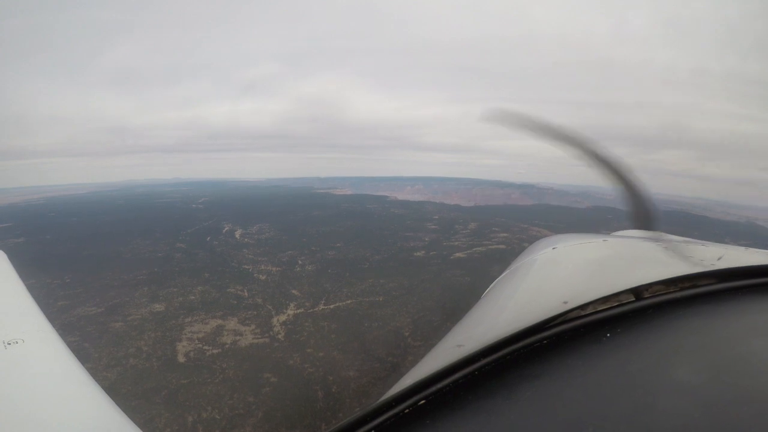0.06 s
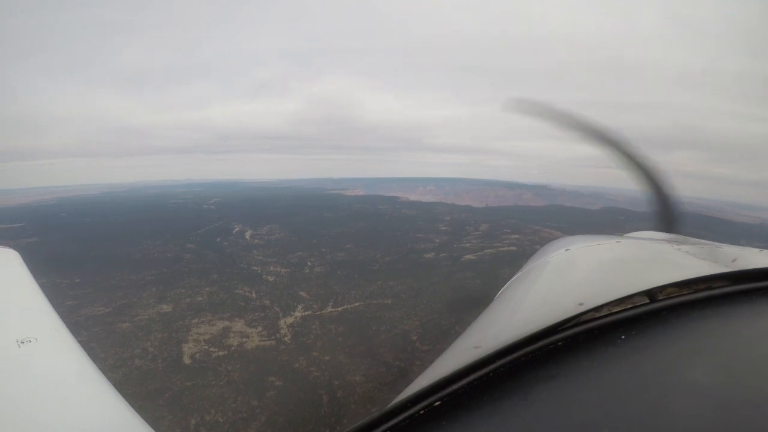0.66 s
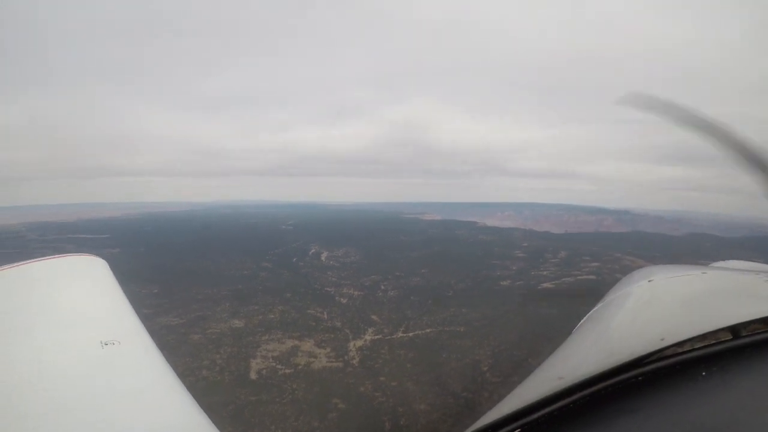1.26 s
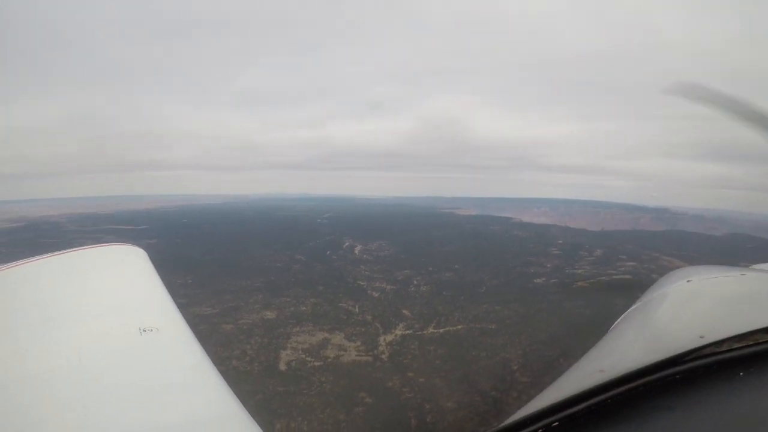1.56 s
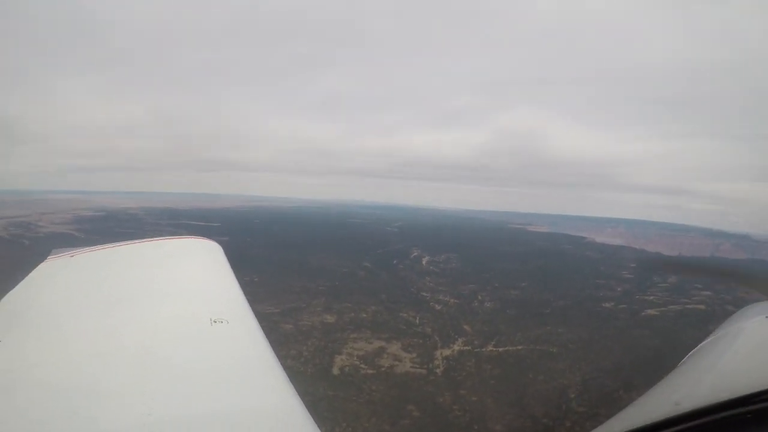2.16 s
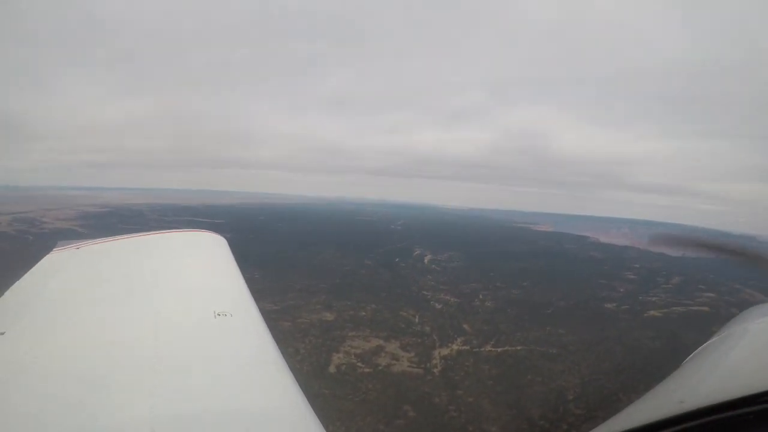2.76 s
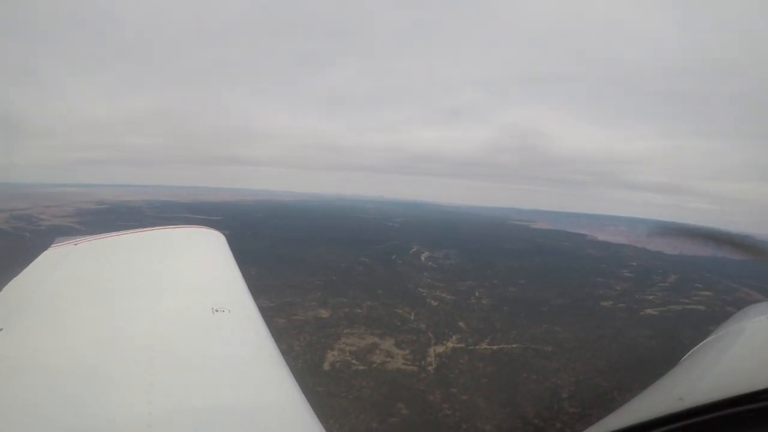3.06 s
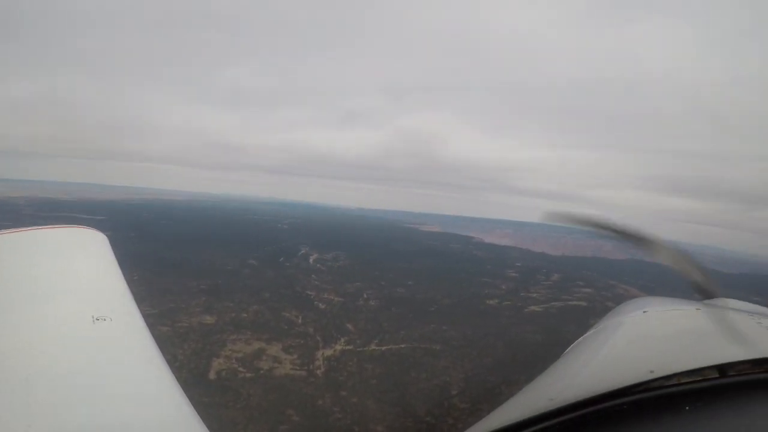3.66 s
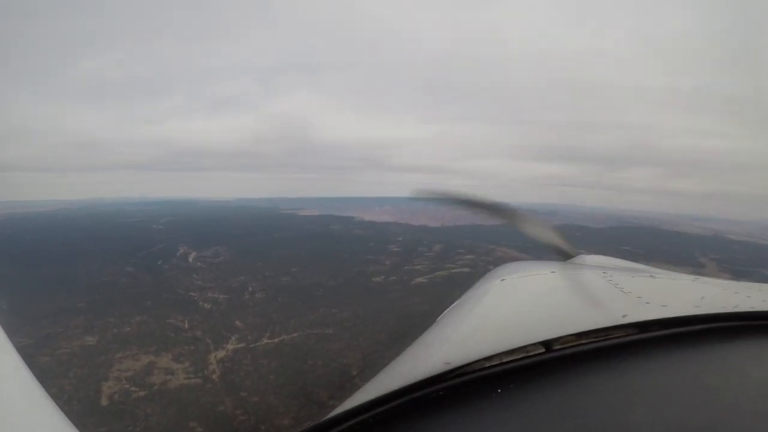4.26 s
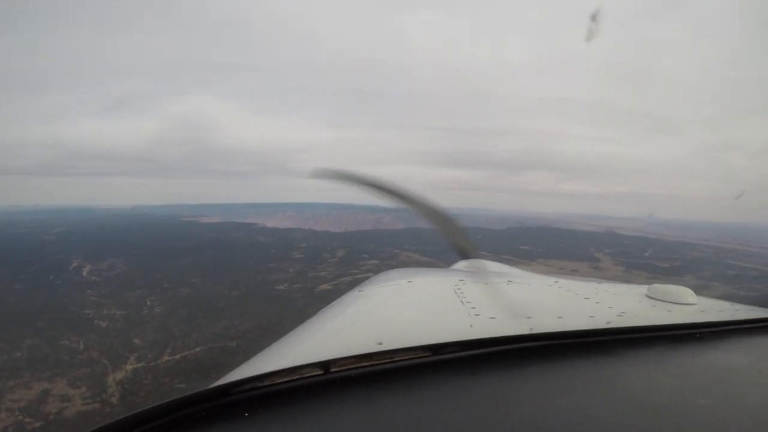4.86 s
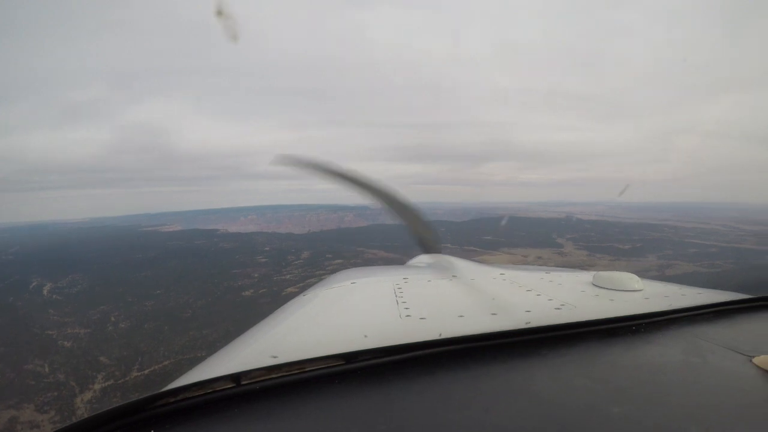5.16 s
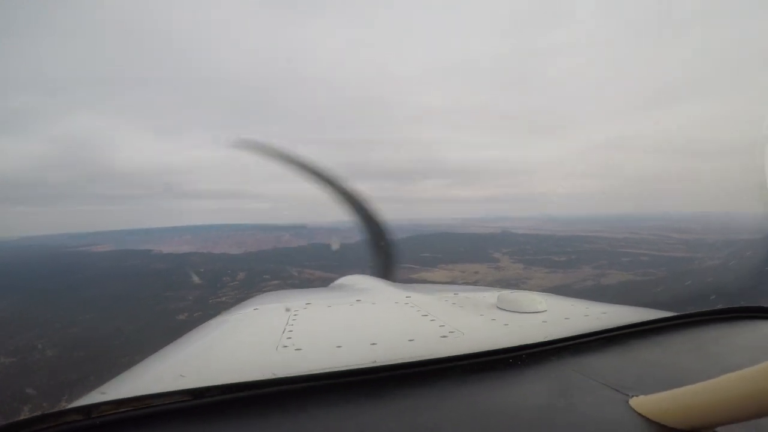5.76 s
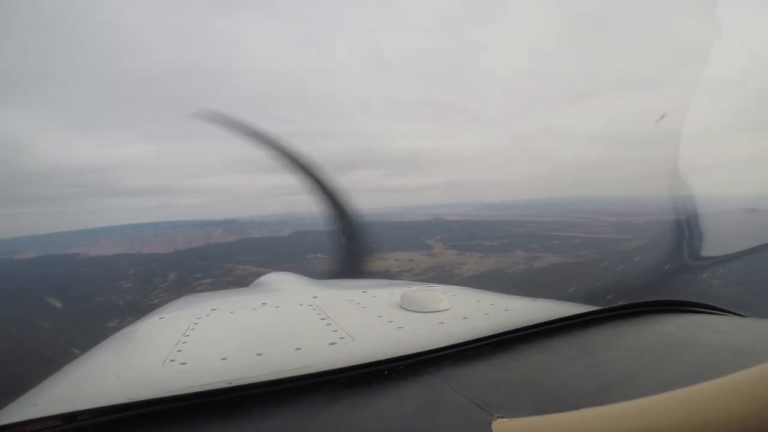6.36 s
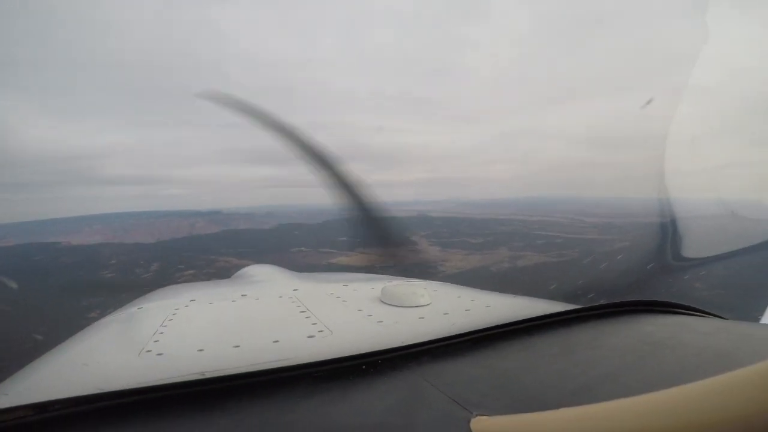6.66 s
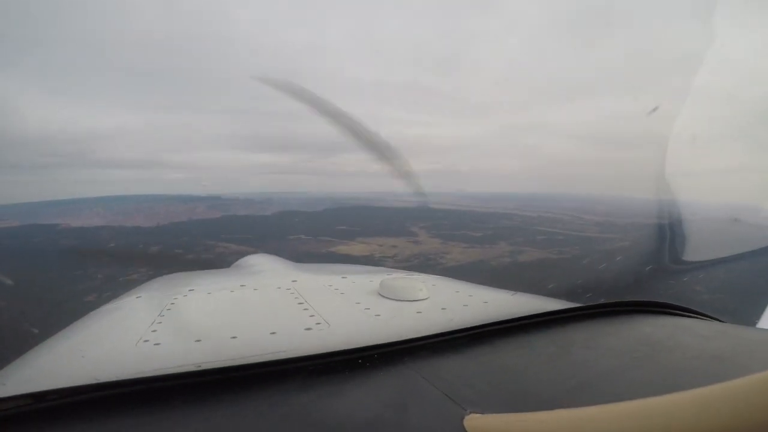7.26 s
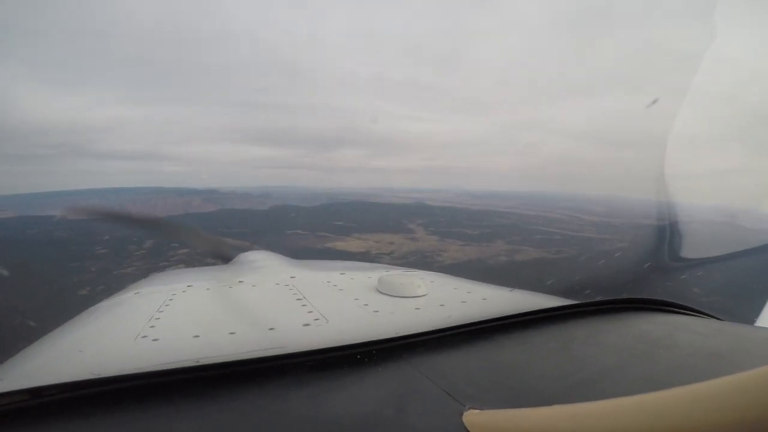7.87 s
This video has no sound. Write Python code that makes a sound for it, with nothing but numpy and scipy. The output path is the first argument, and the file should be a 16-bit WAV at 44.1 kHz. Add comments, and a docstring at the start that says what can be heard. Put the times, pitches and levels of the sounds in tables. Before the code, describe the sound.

A small propeller plane's piston engine drones steadily in cruise, heard inside the cockpit with air roaring and hissing over the canopy.

```python
"""Light aircraft cockpit in cruise

A four-cylinder piston engine turns a two-blade propeller at 2400 rpm. Firings and blades make a deep
hum, a clatter repeats every engine cycle, and the slipstream roars and hisses on the canopy. A small
stereo camera swings from wing to nose, shifting the cabin's colour; its body shakes one microphone."""
import sys
import numpy as np
from scipy import signal
from scipy.fft import rfft, irfft
from scipy.io import wavfile
from scipy.ndimage import uniform_filter1d, minimum_filter1d

SR = 44100
rng = np.random.default_rng(int(sys.argv[2]) if len(sys.argv) > 2 else 0)


def to_wav(s):
    """Save 16-bit WAV."""
    ch = np.atleast_2d(s).T  # columns
    pcm = np.round(np.clip(ch, -1, 1) * 32767)  # PCM
    wavfile.write(sys.argv[1], SR, pcm.astype(np.int16))


N = 358091
TIME_S = np.arange(N) / SR
BINS_HZ = np.maximum(np.arange(N // 2 + 1) * SR / N, 1)
HISS_SETTLE_DB, HISS_SETTLE_S = -6.5, 0.66

# four-stroke cycle rate, two shaft turns per cycle: t/s, f/Hz
CYCLE_RATE = [(0, 20.01), (2.1, 20.035), (3.3, 20.0), (5, 20.04), (8, 20.05)]
# camera jolts: t/s, half length/s, right hum gain/dB, right hum lag/ms, shaft shake/dB, rumble/dB
JOLTS = [(0.55, 0.32, -4.5, -1, -54, -58), (1.096, 0.21, -11, -3.5, -61, -43),
         (1.45, 0.092, -4, 0, -29, -55), (3.58, 0.27, -8, -2.5, -33, -43),
         (4.06, 0.17, -1.5, 1.5, -37, -42), (5.15, 0.27, -0.5, 1, -40, -39), (6.298, 0.18, 2, 1, -39, -35),
         (6.577, .11, 1, 0.5, -26, -40), (7.75, .2, -2.5, 0, -41, -57.5)]


def undb(db):
    """Decibels to gain."""
    return 10 ** (np.asarray(db) / 20)


def curves(table):
    """Columns of a time table, per sample."""
    t_s, *columns = np.transpose(table)
    return [np.interp(TIME_S, t_s, column) for column in columns]


def spectra(table):
    """Columns of a frequency table, per bin."""
    hz, *columns = np.transpose(table)
    return [np.interp(np.log(BINS_HZ), np.log(hz), column) for column in columns]


def turned(heading, wing, nose):
    """Blend from wing (heading 0) to nose (heading 1)."""
    return wing + heading * (nose - wing)


def swell(t_s, half_s):
    """Gaussian bump, peak 1."""
    return np.exp(-((TIME_S - t_s) / half_s) ** 2)


def settle(start_db, tau_s):
    """Decaying level offset in dB."""
    return start_db * np.exp(-TIME_S / tau_s)


def shape(x, gain):
    """Filter by a gain per bin."""
    return irfft(rfft(x) * gain, N)


def unit(x):
    """Scale to rms 1."""
    return x / np.std(x)


def lowpass(hz, slope):
    """Roll-off per bin, 1/2 at hz."""
    return 1 / (1 + (BINS_HZ / hz) ** slope)


def highpass(hz, slope):
    """Complement of lowpass."""
    return 1 / (1 + (hz / BINS_HZ) ** slope)


def resonance(hz, width_hz):
    """Gain per bin of one steep resonance."""
    return 1 / (1 + ((BINS_HZ - hz * hz / BINS_HZ) / width_hz) ** 2)


def band(hz, width_hz):
    """Noise in one resonance, rms 1."""
    return unit(shape(rng.standard_normal(N), resonance(hz, width_hz)))


def walk(rate_hz):
    """Smooth random drift, rms 1."""
    return unit(shape(rng.standard_normal(N), lowpass(rate_hz, 4)))


def gliding(hz, width_hz):
    """Noise band round a moving centre, rms 1."""
    phase = 2 * np.pi * np.cumsum(hz) / SR
    return unit(walk(width_hz) * np.cos(phase) + walk(width_hz) * np.sin(phase))


def mic_pair(a, b, lag_ms=0.05):
    """Two unrelated signals to left and right: alike in the bass, apart in the treble."""
    # likeness of the air at the two microphones: f/Hz, correlation
    likeness = [(30, 0.6), (130, 1), (330, 0.91), (520, 0.83), (800, 0.32), (1400, 0.19), (2100, 0.67),
                (2600, 0.22), (3500, 0.73), (4400, 0.32), (5000, -0.13), (7500, -0.24), (9500, -0.041),
                (13000, .05)]
    # balance of the air: f/Hz, left minus right/dB
    balance = [(400, 2.5), (950, -1), (2400, -0.5), (4400, 1.5), (5600, 2.5), (6700, 0.5), (8000, 0),
               (11000, 0.5)]
    alike = np.clip(spectra(likeness)[0], -0.99, 0.99)
    mid = shape(a, np.sqrt((1 + alike) / 2))
    side = shape(b, np.sqrt((1 - alike) / 2))
    tilt = undb(spectra(balance)[0] / 2)
    # long waves reach the left later; short ones arrive from all round
    delay = np.exp(-2j * np.pi * BINS_HZ * lag_ms / 1000 * lowpass(3200, 6))
    return np.array([shape(mid + side, tilt * delay), shape(mid - side, 1 / tilt)])


def firing_gate(cycle, depth, lump):
    """Gain swelling at each firing, one cylinder stronger than the rest."""
    return 1 + depth * np.cos(8 * np.pi * cycle) + lump * np.cos(2 * np.pi * cycle)


def firing_hum(cycle, heading):
    """Stereo cycle count and dB offset of the hum; in jolts, body vibration alters the right side."""
    # hum drift between microphones: t/s, right lag/ms
    hum_lag = [(0, 0.1), (6.2, -0.41), (6.45, 0.94), (7.2, 2)]
    left_db, right_db = turned(heading, -0.3, 2.5), 0.5
    lag_ms = curves(hum_lag)[0]
    for t_s, half_s, hum_db, shift_ms, _, _ in JOLTS:
        right_db = right_db + hum_db * swell(t_s, half_s)
        lag_ms = lag_ms + shift_ms * swell(t_s, half_s)
    lag_cycles = lag_ms / 1000 * curves(CYCLE_RATE)[0]
    return np.array([cycle, cycle - lag_cycles]), np.array([left_db, right_db])


def panel_lift_db(hz, panel_hz=900, width_hz=23, peak_db=8.3):
    """A panel sings with engine lines near its resonance as the camera passes."""
    return peak_db * swell(4.35, 0.75) / (1 + ((hz - panel_hz) / width_hz) ** 4)


def drone(cycle, heading, waver_db=0.74, flutter_db=1.2):
    """Engine and propeller lines: even firing pulses plus one per cycle from an unlike cylinder."""
    # lines, firings and blades on every fourth: multiple of cycle rate, wing level/dB, nose level/dB
    lines = [(1, -57, -57.5), (2, -51, -60), (3, -54.5, -51.5), (4, -28, -29), (5, -48.5, -51),
             (6, -43, -43), (7, -41.5, -40.5), (8, -34, -35.5), (9, -43.5, -53), (10, -35, -43),
             (12, -30, -29), (13, -40, -40.5), (14, -44.5, -39), (15, -39.5, -38), (16, -42.5, -38),
             (17, -44.5, -48), (18, -43.5, -56), (19, -59, -58.5), (20, -45, -51.5), (21, -53.5, -63.5),
             (23, -52.5, -59), (24, -49, -48), (26, -57.5, -57), (27, -54.5, -57.5), (28, -55, -56.5),
             (29, -57.5, -60.5), (31, -62, -60.5), (32, -67, -58), (36, -69, -51.5), (38, -65, -66),
             (40, -64, -63.5), (41, -62.5, -56.5), (42, -68, -57), (45, -60.5, -59.5), (46, -61, -61),
             (47, -65.5, -64), (48, -68, -64), (50, -63.5, -74), (52, -69.5, -62), (53, -61, -66.5),
             (54, -62, -64), (56, -68.5, -66.5), (59, -64, -74), (60, -61.5, -66), (61, -65, -74)]
    # brief level dips: t/s, half length/s, gain/dB
    dips = [(4.042, 0.0074, -19), (6.48, 0.018, -5), (6.555, 0.36, -1.5)]
    # pulses, smeared into chirps by the airframe: sign, lead/cycles, dispersion/cycles
    firing_pulse, odd_pulse = (1, -0.031, 0.0038), (-1, 0.374, 0.0026)
    trim_db = turned(heading, 0.5, -0.7) + settle(1.7, 0.93)
    out = np.zeros((2, N))
    for order, wing_db, nose_db in lines:
        sign, lead, dispersion = odd_pulse if order % 4 else firing_pulse
        line_db = turned(heading, wing_db, nose_db) + panel_lift_db(order * CYCLE_RATE[0][1])
        if order % 4:  # cylinder balance keeps shifting
            line_db += waver_db * walk(5.8)
        if order >= 17:  # firings vary in sharpness
            line_db += flutter_db * walk(17.0)
        heard_cycle, offset_db = firing_hum(cycle, heading) if order == 4 else (cycle, trim_db)
        turns = order * (heard_cycle + lead) + dispersion * order ** 2
        out += sign * np.sqrt(2) * np.sin(2 * np.pi * turns) * undb(line_db + offset_db)
    return out * undb(sum(db * swell(t_s, half_s) for t_s, half_s, db in dips))


def cyclic_noise(cycle, slip_cycles=0.00073, size=2200):
    """Stereo noise repeating every engine cycle, with slight timing slips."""
    index = (cycle + slip_cycles * walk(6.6)) % 1 * size
    loops = irfft(np.exp(2j * np.pi * rng.random((2, size // 2 + 1))))
    return mic_pair(*(np.interp(index, np.arange(size), loop, period=size) for loop in loops))


def clatter(cycle, heading, wing_db=-48.0, nose_db=-52.5):
    """Exhaust and valve clatter, recurring every engine cycle."""
    # clatter spectrum: f/Hz, gain/dB
    spectrum = [(490, -6), (620, -8), (720, -14), (1100, -12.5), (1270, -18), (1330, -19), (1600, -19),
                (2100, -18.5), (2400, -20.5), (4000, -34.5)]
    blows = cyclic_noise(cycle) * firing_gate(cycle, depth=0.13, lump=0.026)
    colour = undb(spectra(spectrum)[0]) * lowpass(5000, 4) * highpass(490, 30)
    return unit(shape(blows, colour)) * undb(turned(heading, wing_db, nose_db))


def rasp(cycle, width_hz=170):
    """Midrange rasp pulsed by the firings; slides down as the camera leaves the window."""
    # rasp band: t/s, f/Hz, level/dB
    track = [(0, 2003, -58.5), (2.2, 1995, -63), (4.1, 1920, -57.5), (4.7, 1613, -57), (5.8, 1586, -66),
             (8, 1600, -62)]
    hz, db = curves(track)
    return gliding(hz, width_hz) * firing_gate(cycle, depth=0.18, lump=0.14) * undb(db)


def turbulence(table, heading, power_response):
    """Stereo air noise whose colour follows the heading."""
    noise = mic_pair(*rng.standard_normal((2, N))) * np.sqrt(SR / 2)
    wing, nose = (shape(noise, undb(db) * np.sqrt(power_response)) for db in spectra(table))
    return turned(heading, wing, nose)


def canopy_echo(x, heading, wing_ms=1.004, nose_ms=1.37, gain=0.047):
    """Direct sound plus one moving canopy reflection: a shallow sliding comb."""
    lag_s = turned(heading, wing_ms, nose_ms) / 1000
    return x + gain * np.array([np.interp(TIME_S - lag_s, TIME_S, channel) for channel in x])


def slipstream(cycle, heading, split_hz=1300, seal_hz=5200, flicker_db=0.52, gust_db=1):
    """Roar pulsed by propeller wash, cabin boom, rush over the canopy and hiss at its seals."""
    # turbulent roar density: f/Hz, wing level/dB, nose level/dB
    roar_spectrum = [(15, -59.5, -67), (40, -64.5, -57), (81, -61, -63), (118, -57, -57.5),
                     (174, -61, -58.5), (216, -60, -60), (261, -60, -54), (330, -60, -60.5),
                     (431, -63.5, -69), (560, -68.5, -71.5), (696, -67, -69.5), (747, -74.5, -69.5),
                     (900, -72, -68.5), (990, -73.5, -74.5), (1330, -76, -80.5)]
    # canopy airflow density: f/Hz, wing level/dB, nose level/dB
    air_spectrum = [(1270, -77, -73), (1920, -79, -81), (2270, -80.5, -83), (2780, -82.5, -86),
                    (4400, -88.5, -89.5), (4800, -88, -90.5), (5320, -88.5, -86.5), (6140, -83.5, -80.5),
                    (7550, -83, -82.5), (8100, -87, -91), (9830, -93, -92), (11280, -108, -105.5),
                    (13100, -112, -111), (15000, -120.9, -120.9)]
    # cabin air resonances: f/Hz, width/Hz, wing level/dB, nose level/dB
    cabin_modes = [(118, 14, -43, -51), (218.3, 17, -43.5, -59.5), (284.4, 22, -41, -43.5),
                   (353, 16.6, -42, -52.5), (387.7, 16, -47.5, -55)]
    low, high = lowpass(split_hz, 12), highpass(seal_hz, 12)
    roar = turbulence(roar_spectrum, heading, low) * firing_gate(cycle, depth=0.093, lump=0.041)
    boom = sum(undb(turned(heading, wing_db, nose_db)) * band(hz, width_hz)
               for hz, width_hz, wing_db, nose_db in cabin_modes)
    rush = turbulence(air_spectrum, heading, (1 - low) * (1 - high))
    rush *= firing_gate(cycle, depth=0.024, lump=0.031)
    rush *= undb(turned(heading, 1.1, -0.1) + settle(-6.5, 0.96) + gust_db * swell(6.33, 0.14))
    hiss = turbulence(air_spectrum, heading, high) * firing_gate(cycle, depth=0.015, lump=0.03)
    hiss *= undb(turned(heading, 0.6, -1.46) + settle(HISS_SETTLE_DB, HISS_SETTLE_S))
    flicker = undb(flicker_db * walk(14))
    # the hiss comes straight from close by
    return canopy_echo(roar + rush * flicker, heading) + boom + hiss * flicker


def corner_roar(hz=500, width_hz=85):
    """Hollow resonance between canopy and side window, heard when the camera is near."""
    # corner roar: t/s, level/dB
    levels = [(0, -55), (.7, -42), (1.6, -47.5), (3.8, -48.5), (4.6, -58), (6.2, -60)]
    noise = mic_pair(*rng.standard_normal((2, N)))
    return unit(shape(noise, resonance(hz, width_hz))) * undb(curves(levels)[0])


def passing_resonances():
    """Resonances that each swell as a microphone moves past: standing waves under the canopy, and near 900 Hz
    the buzz of the singing panel."""
    # passes: t/s, half length/s, f/Hz, width/Hz, left level/dB, right level/dB
    passes = [(0.2, 0.8, 600, 70, -49, -49), (0.603, 1.6, 1100, 200, -58.5, -58),
              (3.0, 1.2, 710, 49.7, -70, -46.5), (4.3, 0.9, 892, 50, -58.5, -55),
              (3.01, 0.76, 1450, 90.5, -59, -68), (3.15, 0.66, 823, 64, -49, -65),
              (3.95, .4, 3500, 200, -65, -61), (3.9, 0.73, 1064, 110, -56, -55),
              (4.1, .35, 2780, 200, -65, -60), (4.17, 0.7, 388, 45, -43.5, -45),
              (5.9, 0.7, 5800, 970, -61, -58), (5.7, 0.8, 8500, 1100, -67, -58.5),
              (7.3, 1.4, 7950, 550, -76, -60.5), (5.6, 0.8, 153, 44, -42.5, -42),
              (3.8, 0.6, 105, 18, -41, -42), (2.4, 2.2, 920, 57, -72, -52), (1.8, 0.8, 790, 70, -52.5, -64),
              (7.0, 1.0, 480, 40, -54, -52), (7.7, 1, 2400, 900, -61, -56.5)]
    return sum(band(hz, width_hz) * swell(t_s, half_s) * undb([[left_db], [right_db]])
               for t_s, half_s, hz, width_hz, left_db, right_db in passes)


def seal_leak(width_hz=620, base_db=-56.5, pass_db=8.5, right_gain=-0.28):
    """Thin wandering jet at the left canopy seal, loudest as the camera swings past."""
    # jet centre: t/s, f/Hz
    pitch = [(0, 6700), (4.2, 7090), (4.7, 7150), (5.5, 6710), (6.1, 6830), (6.6, 7550), (8, 7750)]
    level_db = base_db + settle(HISS_SETTLE_DB, HISS_SETTLE_S) + pass_db * swell(5.4, 1.05)
    jet = gliding(curves(pitch)[0], width_hz) * undb(level_db)
    # half a wavelength further on, the right is weaker and inverted
    return np.array([jet, right_gain * jet])


def top_hiss(hz=12400, width_hz=2200, start_db=-75.0, fade_s=2.2):
    """Faint high hiss, fading as the rush builds."""
    return np.array([band(hz, width_hz), band(hz, width_hz)]) * undb(start_db) * swell(0, fade_s)


def camera_shake(cycle, heading, left_db=-23, tone_db=-1.5, rattle_db=-9):
    """Shaft unbalance and buffeting shake the camera, harder in jolts, mostly on the right."""
    shaft_gain, rumble_gain = undb(turned(heading, -43, -40)), undb(turned(heading, -57, -44))
    for t_s, half_s, _, _, shaft_db, rumble_db in JOLTS:
        shaft_gain = np.hypot(shaft_gain, undb(shaft_db) * swell(t_s, half_s))
        rumble_gain = np.hypot(rumble_gain, undb(rumble_db) * swell(t_s, half_s))
    tone = undb(tone_db) * np.sqrt(2) * np.sin(4 * np.pi * cycle)
    rattle = undb(rattle_db) * band(42, 22)
    body = shaft_gain * (tone + rattle) + rumble_gain * band(27, 13)
    return np.array([undb(left_db) * body, body])


def window_rush(hz=4400, width_hz=3600, cutoff_hz=8500):
    """Air on the side window, near the left microphone while the camera faces the wing."""
    # window rush: t/s, level/dB
    levels = [(1.6, -74), (2, -52.5), (4.1, -57), (4.4, -76)]
    air = shape(band(hz, width_hz), lowpass(cutoff_hz, 10))
    return np.array([air * undb(curves(levels)[0]), np.zeros(N)])


def limit(x, ceiling=0.2, size=700):
    """Look-ahead limiter: both channels duck round each peak above the ceiling."""
    gain = ceiling / np.maximum(np.abs(x).max(axis=0), ceiling)
    return x * uniform_filter1d(minimum_filter1d(gain, size), size)


def scene():
    """Engine, airflow and camera shake, sharing one cycle count and heading."""
    # camera swing: t/s, heading (0 wing, 1 nose)
    swing = [(0, 0.15), (1.2, 0), (2.8, 0.06), (3.9, 0.047), (4.5, 0.59), (5.3, 0.66), (6.3, 0.86),
             (8.1, 0.75)]
    heading = np.clip(curves(swing)[0], 0, 1)
    cycle = np.cumsum(curves(CYCLE_RATE)[0]) / SR
    engine = drone(cycle, heading) + clatter(cycle, heading) + rasp(cycle)
    air = slipstream(cycle, heading) + corner_roar() + passing_resonances() + seal_leak() + top_hiss()
    return engine + air + camera_shake(cycle, heading) + window_rush()


def record(dry):
    """The camera drops the deepest rumble, limits peaks and cuts the top."""
    low_cut = signal.butter(2, 14, "high", fs=SR, output="sos")
    high_cut = signal.ellip(8, 0.1, 80, 15150, fs=SR, output="sos")
    return signal.sosfilt(high_cut, limit(signal.sosfilt(low_cut, dry)))


dry = scene()
out = record(dry)
to_wav(out)
```